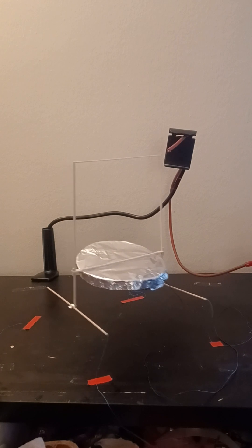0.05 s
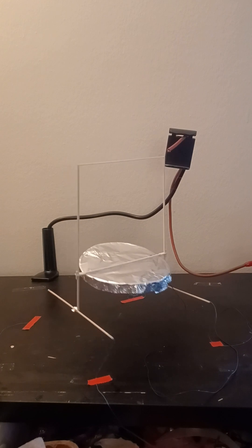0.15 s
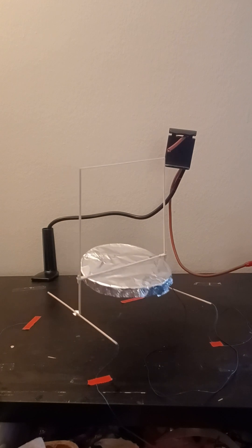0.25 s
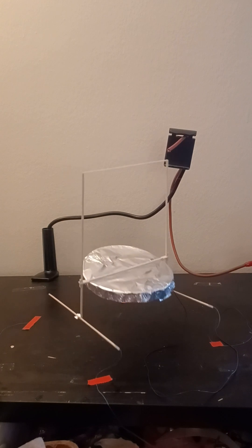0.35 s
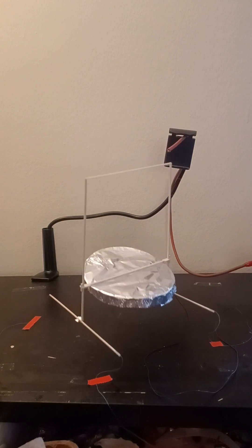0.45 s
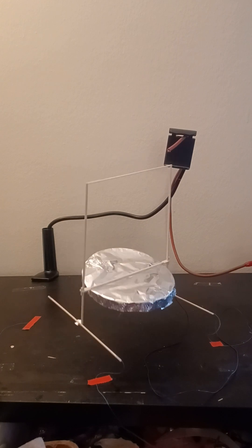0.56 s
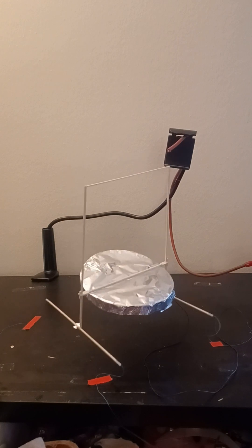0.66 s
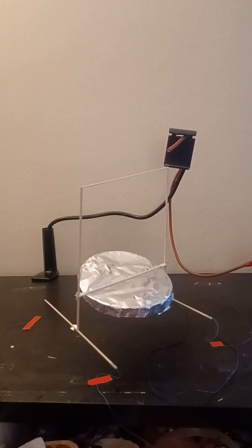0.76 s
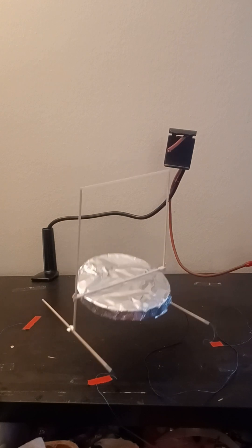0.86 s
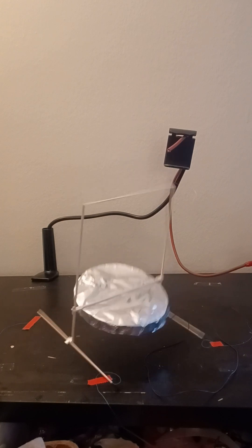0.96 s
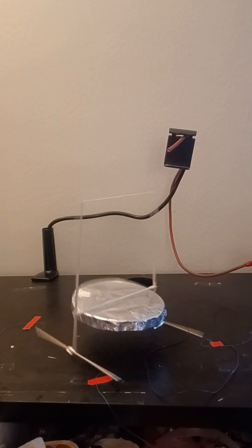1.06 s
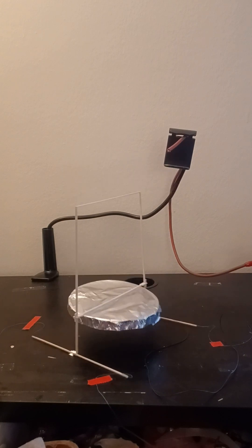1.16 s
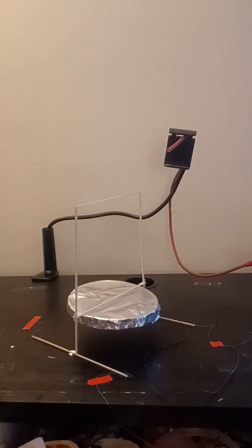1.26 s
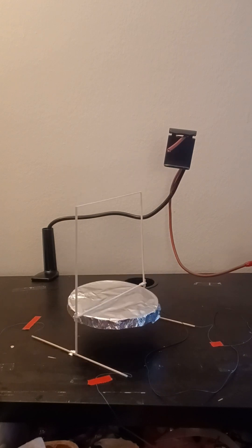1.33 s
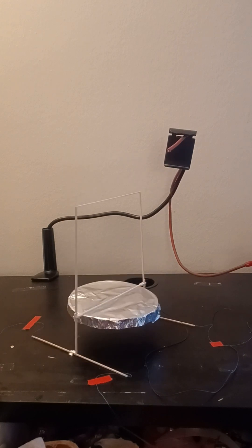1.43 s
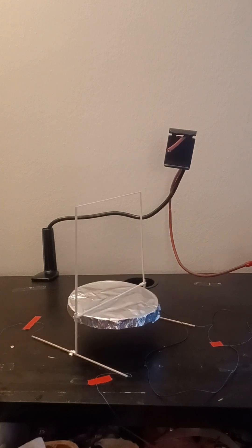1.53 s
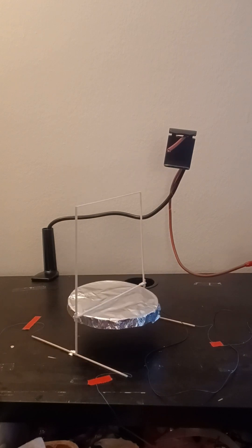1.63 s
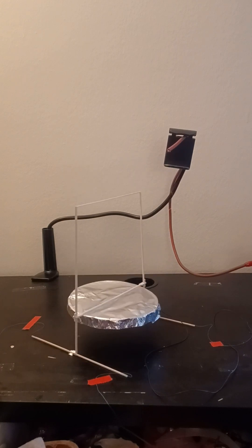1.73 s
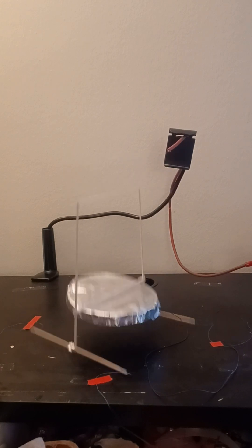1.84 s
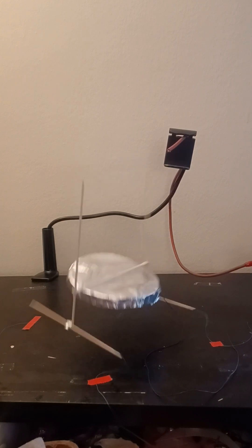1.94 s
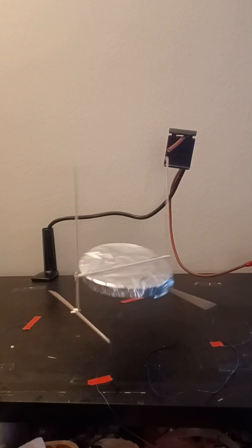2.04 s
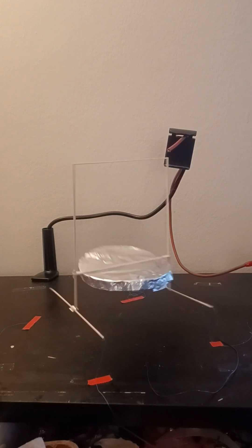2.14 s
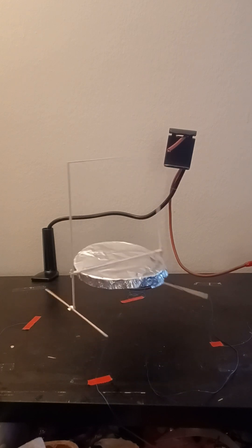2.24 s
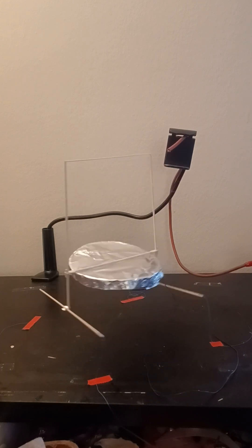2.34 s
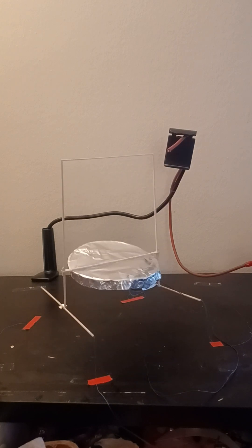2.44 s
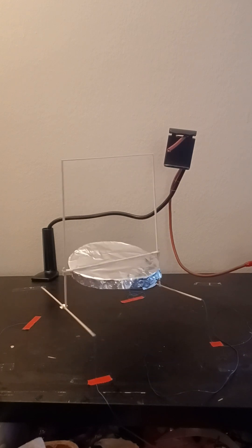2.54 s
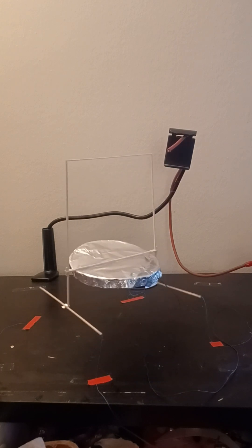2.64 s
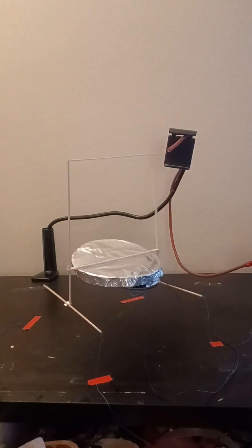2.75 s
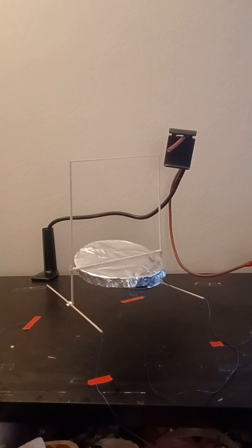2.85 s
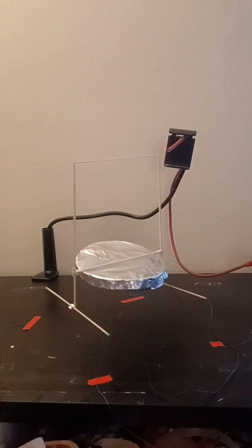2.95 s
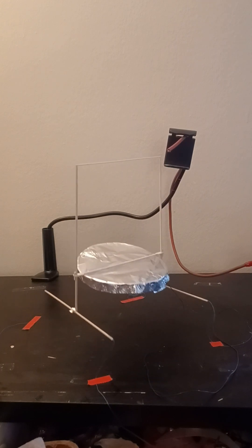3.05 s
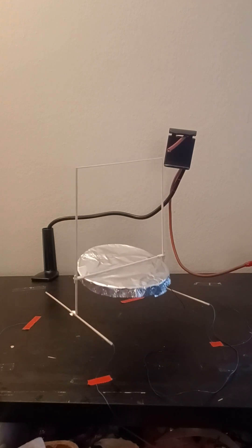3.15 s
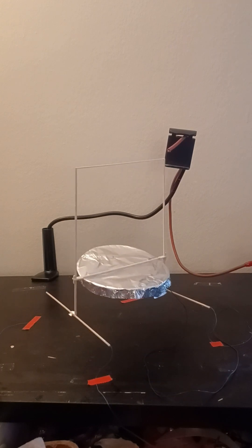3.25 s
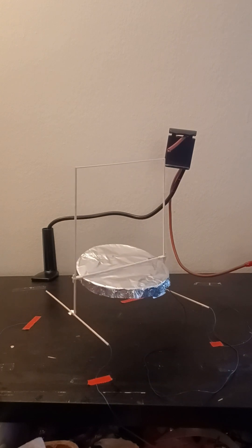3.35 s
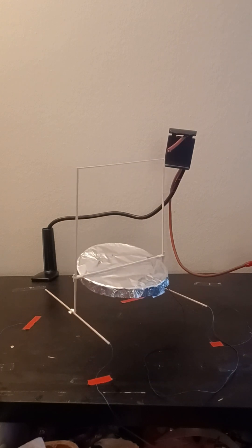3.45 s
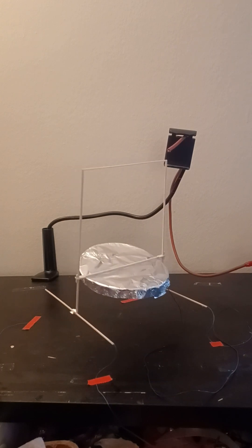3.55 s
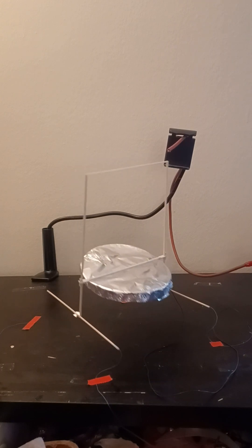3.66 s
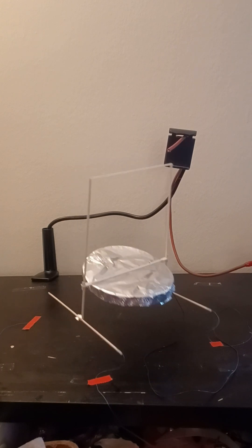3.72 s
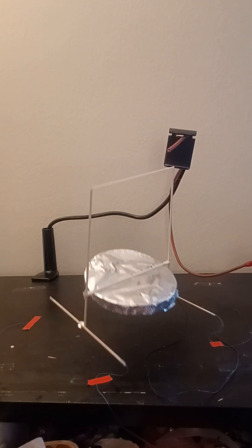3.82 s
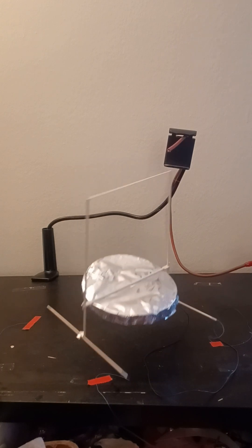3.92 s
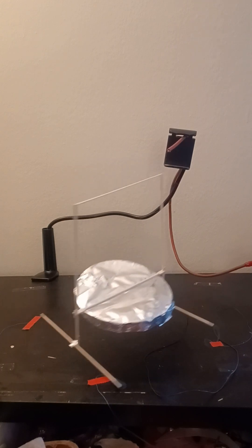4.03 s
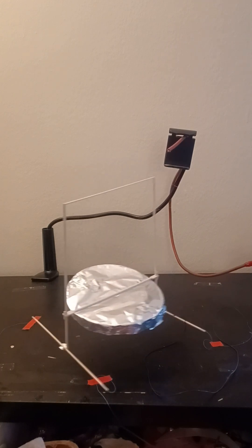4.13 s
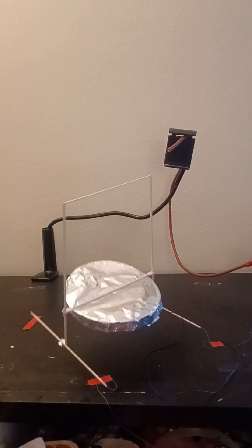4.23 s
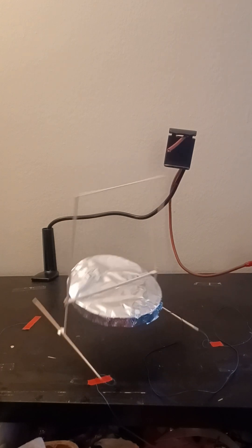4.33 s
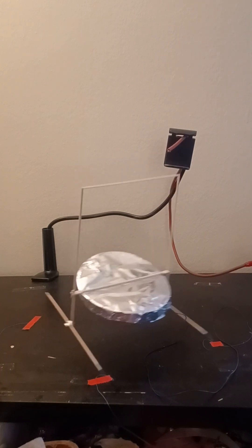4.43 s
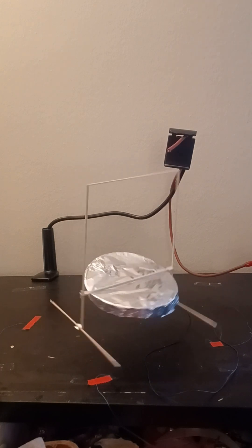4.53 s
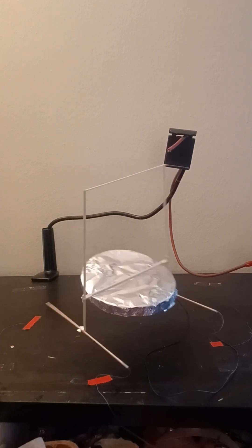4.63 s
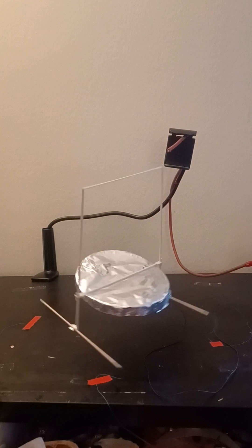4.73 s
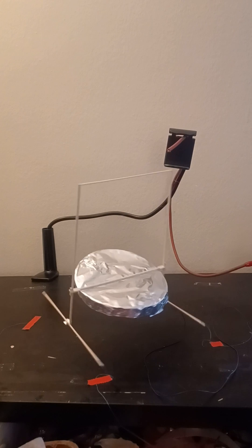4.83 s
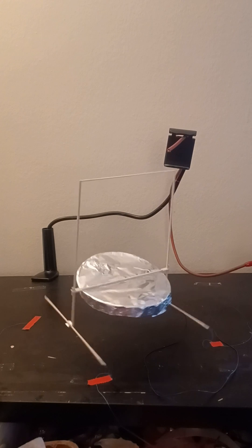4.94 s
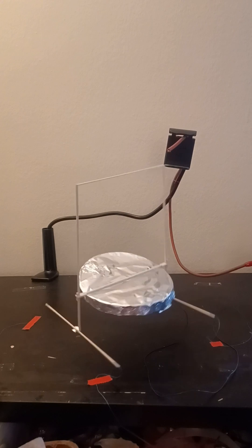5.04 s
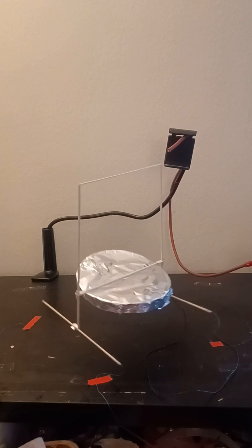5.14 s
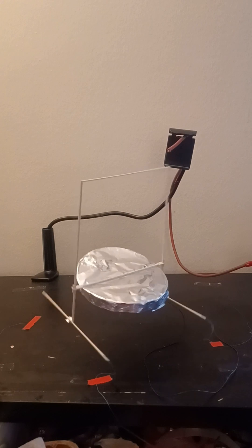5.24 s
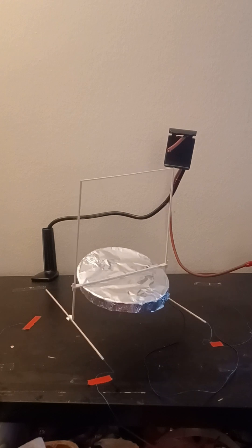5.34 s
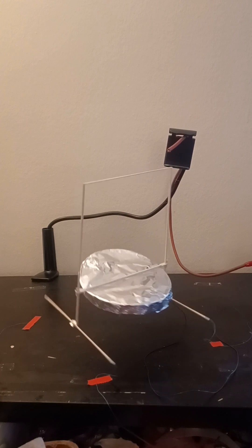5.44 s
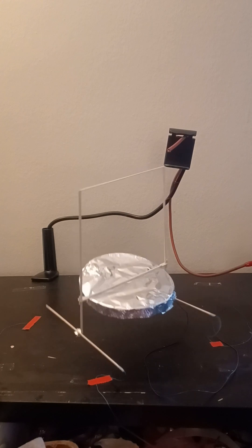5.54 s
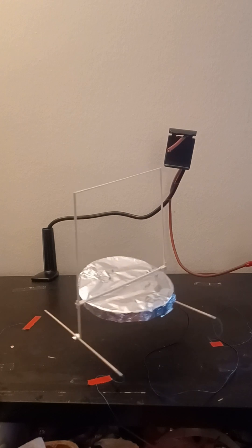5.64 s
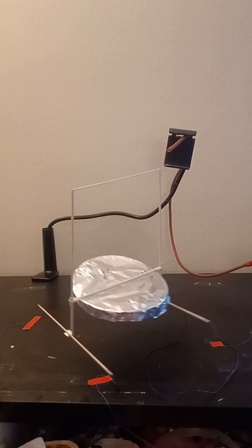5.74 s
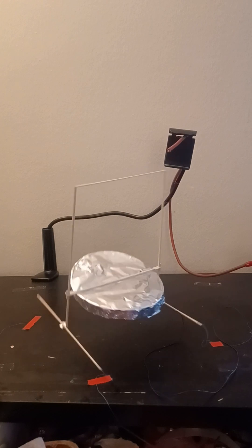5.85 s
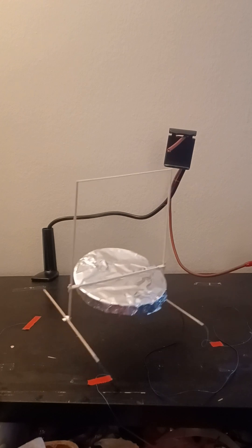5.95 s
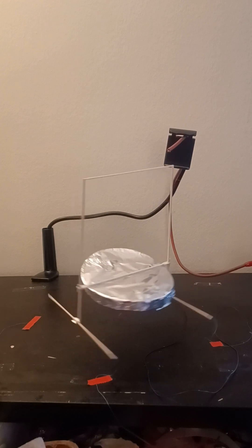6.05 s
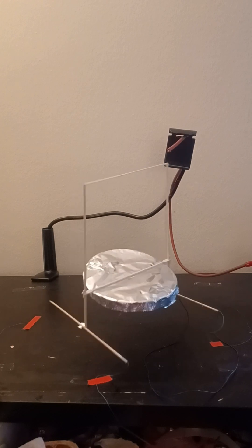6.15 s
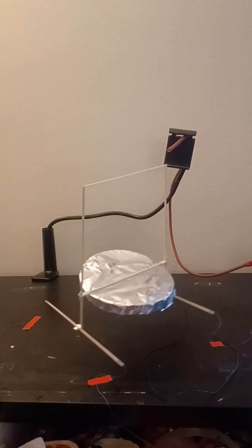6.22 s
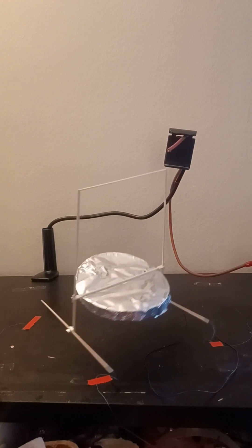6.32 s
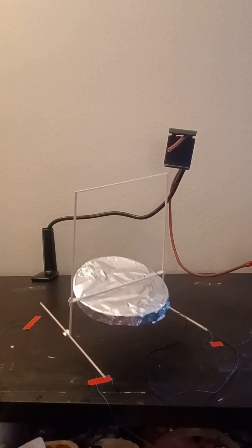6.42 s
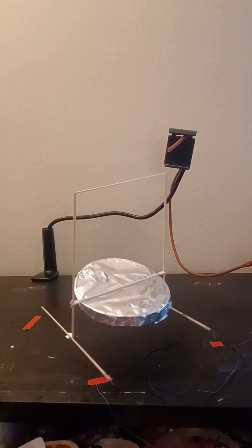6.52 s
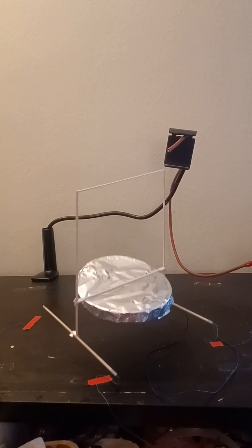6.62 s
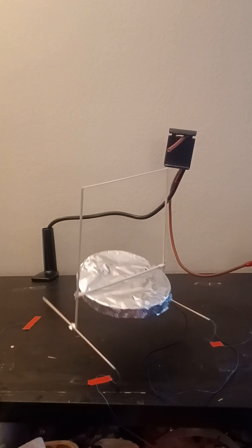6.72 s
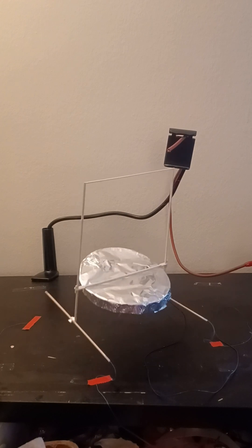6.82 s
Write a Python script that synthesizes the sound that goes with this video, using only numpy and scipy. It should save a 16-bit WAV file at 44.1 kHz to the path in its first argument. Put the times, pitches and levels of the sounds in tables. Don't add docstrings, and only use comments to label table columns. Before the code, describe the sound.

A light foil-covered frame hovers above a bench in a small hard room, a thin wire hissing brightly and steadily. The hiss weakens, the frame taps down, and a loud dry spark snaps, its crack filling the room. The hiss drops almost away; then a faint switch click and it strikes back abruptly, holding to the end over very quiet rumble and hum. Close stereo microphones, noisier and brighter on the left.

```python
import sys
import numpy as np
from scipy import signal
from scipy.io import wavfile
from scipy.ndimage import uniform_filter1d

SR = 44100
rng = np.random.default_rng(int(sys.argv[2]) if len(sys.argv) > 2 else 0)


def transcribe(signal):
    frames = np.atleast_2d(signal).T
    limited = np.clip(frames, -1, 1)
    pcm = np.round(limited * 32767).astype(np.int16)
    wavfile.write(sys.argv[1], SR, pcm)


def volts_from_db(level):
    exponent = np.asarray(level, float) / 20
    return 10 ** exponent


N = 303408

# (frequency [Hz], level [dB per Hz])
HISS_LEFT = [(300, -103), (800, -97), (1250, -91.5), (1500, -88.5), (2650, -83), (3100, -82.5), (5000, -78),
             (6400, -74.5), (7000, -77.5), (7600, -85), (8500, -84), (11000, -76), (13300, -68.5),
             (15500, -68)]
HISS_RIGHT = [(300, -102.5), (800, -100.1), (1250, -100.4), (1500, -92.5), (2650, -85), (3100, -83),
              (5000, -77.5), (6400, -84), (7000, -81.5), (7600, -88.5), (8500, -88), (11000, -84),
              (13300, -81), (15500, -86)]
# (frequency [Hz], width [Hz], level [dB])
REFLECTIONS = [(1180, 80, 2), (1500, 40, 4), (1680, 50, 3), (1940, 50, 4), (2430, 90, -2), (2000, 220, 1.5),
               (2650, 250, -1.5), (2850, 80, -2), (3300, 200, 2), (3445, 30, 2), (3550, 60, -4),
               (3770, 60, 4), (4900, 50, 2), (5050, 80, -2)]
# (frequency [Hz], level [dB per Hz])
SNAP_LEFT = [(150, -82), (400, -80), (1400, -71.5), (2500, -75), (4000, -71), (6800, -68), (7500, -84),
             (9000, -74.5), (12000, -78), (13000, -72), (15500, -90)]
SNAP_RIGHT = [(150, -83), (400, -83), (1400, -74), (2500, -76.5), (4000, -71.5), (6800, -75.5), (7500, -78),
              (9000, -82), (12000, -80), (13000, -81), (15500, -82)]
# (time [s], level [dB], burst length [s], direct sound [dB])
SPARKS = [
    (1.0665, -14.5, 0.01, -10),
    (1.099, -11.5, 0.0081, -8),
    (1.11, -5, 0.025, -7.5),
]
# (time [s], level [dB], burst length [s], direct sound [dB])
SWITCH = (1.7973, -35, .002, -5)
PARTS = {"thread": (2010, 140, 1), "strut": (2120, 760, 3), "foil": (4900, 4800, 1.5),
         "rim": (14400, 4000, 13), "foot": (1500, 460, 5.5), "joint": (2380, 600, -2),
         "board": (910, 300, 4), "bench": (600, 540, -1.9), "lead": (980, 160, -1), "clamp": (810, 180, -3),
         "floor": (229, 20, 3)}
# (time [s], part, level [dB], scrape length [s])
TOUCHES = [(0.927, "thread", -61.5, .03), (0.944, "foil", -53, 0.015), (0.946, "strut", -60, .049),
           (1.0665, "board", -61, .0057), (1.066, "joint", -47.5, .003), (1.0668, "foot", -47, .0053),
           (1.097, "rim", -33.5, 0.017), (1.102, "bench", -59, .031), (2.1, "lead", -58.5, 0.062),
           (2.131, "clamp", -63.5, 0.11), (2.506, "floor", -63.5, 0.022), (2.718, "floor", -59.5, 0.12),
           (3.022, "lead", -62, 0.047), (0.946, "clamp", -69, .05)]
# (frequency [Hz], t60 [s])
ROOM_T60 = [(200, 0.43), (1500, 0.38), (5000, 0.34), (9000, 0.27), (15000, 0.29)]
# (frequency [Hz], likeness [-1 to 1])
ALIKE = [(60, 0.63), (180, 0.91), (550, 0.048), (1650, 0.32), (4970, 0.049), (15000, -0.05)]
# (frequency [Hz], width [Hz], level [dB])
HUM = [(59.6, 5, -84.5), (120.6, 6.8, -79), (164.7, 4.4, -88), (224.8, 13.6, -81)]
# (time [s], level [dB], half length [s])
SURGES = [(.45, 1.5, .2), (2.4, 5.5, .4), (3.6, 4.5, 0.41), (4.2, 2.5, 0.083), (4.95, 2.5, 0.091),
          (6.05, 5, 0.086), (6.85, 4, 0.091)]
# (frequency [Hz], level [dB per Hz])
FLOOR_LEFT = [(30, -110), (70, -89), (120, -89), (230, -91.5), (400, -101), (1000, -115), (2500, -125.5),
              (5250, -126), (5500, -110.5), (6900, -112.5), (7300, -124), (12900, -117), (13200, -106),
              (15500, -103.5)]
FLOOR_RIGHT = [(30, -114.8), (70, -102.1), (120, -88.5), (230, -94), (400, -109.5), (1000, -114.0),
               (2500, -122.5), (5100, -123.1), (5700, -119.1), (6900, -120.2), (7500, -123.4),
               (12500, -124.6), (13500, -124.0), (15500, -124.1)]

HISS_DB, TREBLE_HZ, DIRECT_DB = 1, 9000, -11.5
STRETCHES = 3
BIGGEST = 4.0
ONE_VOICE_HZ, ONE_VOICE = 3420, 0.49
FLUTTER_DB, FLUTTER_SIZE = 0.5, 1200
SAG_AT_S, SAG_S, SAG_DB = 0.82, 0.047, -12
SHORT_AT_S, SHORT_S, OFF_DB = 1.095, 0.02, -12
LEAK_DB_PER_S = -37
RESTART_AT_S, STRIKE_DB, RESTART_S = 1.815, -24, 0.009
SURGE_DB, SETTLE_S, THIN_STRIKE = 6, 0.016, 0.35
CREEP_DB_PER_S, AFTER_DB = 0.27, -0.9
THIN_FULL, THIN_WEAK = 0.081, 0.36
SNAP_DB = 38.5
ONSET_SHARE = 0.1
BASS_ALIKE, BASS_HZ = 0.74, 500
RUMBLE_DB, WAVER_DB = -3, 1.5
PORT_LAG = 4
EDGE_HZ, LOW_CUT_HZ = 15790, 48


def corona(per_s=9000, spread_db=3.0):
    level_db, treble = field()
    lead = SR // 2
    level_db = np.pad(level_db, (lead, 0), "edge")
    share = np.pad(treble, (lead, 0), "edge")
    common = rng.standard_normal(N + lead)
    long_waves = signal.butter(2, ONE_VOICE_HZ, fs=SR, output="sos")
    high = signal.butter(2, TREBLE_HZ, "high", fs=SR, output="sos")
    out = np.zeros((2, N))
    for _ in range(STRETCHES):
        chance, size, sign = rng.random((3, N + lead))
        strength = volts_from_db(spread_db * np.minimum(-np.log(size + 1e-9), BIGGEST))
        clicks = evened((chance < per_s / SR) * strength * np.sign(sign - 0.5))
        in_step = np.sqrt(ONE_VOICE) * common + (np.sqrt(1 - ONE_VOICE) - 1) * clicks
        clicks += signal.sosfiltfilt(long_waves, in_step)
        current = uniform_filter1d(rng.standard_normal(N + lead), FLUTTER_SIZE)
        flutter = evened(uniform_filter1d(current, FLUTTER_SIZE))
        bright = signal.sosfilt(high, clicks)
        gain = volts_from_db(level_db + FLUTTER_DB * np.tanh(flutter))
        hiss = gain * ((1 - share) * clicks + share * bright)
        out += room(hiss, DIRECT_DB)[:, lead:lead + N]
    return volts_from_db(HISS_DB) * colour(out / np.sqrt(STRETCHES), HISS_LEFT, HISS_RIGHT, REFLECTIONS)


def field():
    t = np.arange(N) / SR
    before = SAG_DB * ramp(SAG_AT_S, SAG_S) + OFF_DB * ramp(SHORT_AT_S, SHORT_S)
    before += LEAK_DB_PER_S * np.maximum(t - SHORT_AT_S, 0)
    fresh = np.exp(-np.maximum(t - RESTART_AT_S, 0) / SETTLE_S) * (t >= RESTART_AT_S)
    after = STRIKE_DB * (1 - ramp(RESTART_AT_S, RESTART_S)) + AFTER_DB + SURGE_DB * fresh
    drop_db = np.where(t < RESTART_AT_S, before, after)
    weakness = np.clip(drop_db / SAG_DB, 0, 1)
    thin = THIN_FULL + (THIN_WEAK - THIN_FULL) * weakness + THIN_STRIKE * fresh
    return drop_db + CREEP_DB_PER_S * (t - N / SR / 2), thin


def sparks():
    out = np.zeros((2, N))
    for s, db, seconds, direct_db in SPARKS + [SWITCH]:
        add(out, s, volts_from_db(db) * room(burst(seconds), direct_db))
    return volts_from_db(SNAP_DB) * colour(out, SNAP_LEFT, SNAP_RIGHT)


def knocks(direct_db=-4):
    out = np.zeros((2, N))
    for s, part, db, seconds in TOUCHES:
        hz, width, pan_db = PARTS[part]
        scrape = np.pad(burst(seconds), (0, 3000))
        ring = resonate(resonate(scrape, hz, width), hz, width)
        gain = volts_from_db([[db + 35 + pan_db / 2], [db + 33.5 - pan_db / 2]])
        add(out, s, gain * room(ring / np.linalg.norm(ring), direct_db))
    return out


def floor():
    own, shared = rng.standard_normal((2, N)), rng.standard_normal(N)
    low = signal.butter(2, BASS_HZ, fs=SR, output="sos")
    swell = rumble_swell()
    rumble = swell * (np.sqrt(BASS_ALIKE) * shared + np.sqrt(1 - BASS_ALIKE) * own)
    bass = signal.sosfilt(low, rumble - own)
    hum = np.zeros((2, N))
    for hz, width, db in HUM:
        band = resonate(resonate(shared + 0.13 * own, hz, width), hz, width)
        hum += volts_from_db(db) * evened(band)
    mains = volts_from_db(-74) * np.sin(2 * np.pi * 120 * np.arange(N) / SR)
    return colour(own + bass, FLOOR_LEFT, FLOOR_RIGHT) + (swell * hum + mains) * volts_from_db([[2.5], [-2.5]])


def rumble_swell():
    t = np.arange(N) / SR
    waver = sum(np.sin(2 * np.pi * (f * t + rng.random())) / np.sqrt(f) for f in np.geomspace(0.5, 5, 12))
    swells = sum(db * np.exp(-((t - s) / half) ** 2) for s, db, half in SURGES)
    return volts_from_db(RUMBLE_DB + WAVER_DB * evened(waver) + swells)


def room(x, direct_db, rise=0.0022):
    hz, t, z = signal.stft(rng.standard_normal((2, SR // 2)), SR, nperseg=128)
    alike = np.clip(read(ALIKE, hz), 0, 0.95)[:, None]
    z = np.array([z[0], alike * z[0] + np.sqrt(1 - alike ** 2) * z[1]])
    t60 = read(ROOM_T60, hz)[:, None]
    decay = volts_from_db(-60 * t / t60) / np.sqrt(t60)
    tail = signal.istft(z * decay, SR, nperseg=128)[1]
    tail *= 1 - np.exp(-np.arange(tail.shape[1]) / SR / rise)
    tail /= np.linalg.norm(tail, axis=1, keepdims=True)
    tail[[0, 1], [PORT_LAG, 0]] += volts_from_db(direct_db)
    return signal.fftconvolve(x[None], tail / np.sqrt(1 + volts_from_db(2 * direct_db)), axes=1)


def colour(x, left, right, ridges=()):
    hz = abs(np.fft.fftfreq(4096, 1 / SR))
    ripple_db = sum(db * np.exp(-((hz - f) / width) ** 2) for f, width, db in ridges)
    level_db = [read(left, hz) + ripple_db, read(right, hz) + ripple_db]
    log_gain = np.log(volts_from_db(level_db) * np.sqrt(SR / 2))
    taps = np.fft.ifft(np.exp(np.conj(signal.hilbert(log_gain)))).real[:, :2048]
    return signal.oaconvolve(x, taps, axes=1)[:, :N]


def resonate(x, hz, width):
    turn = np.exp(2j * np.pi * hz * np.arange(x.shape[-1]) / SR)
    r = np.exp(-np.pi * width / SR)
    return 2 * (turn * signal.lfilter([1 - r], [1, -r], x / turn)).real


def burst(seconds):
    t = np.arange(round(5 * seconds * SR) + 4) / SR
    envelope = np.exp(-t / seconds) * (1 - np.exp(-t / (ONSET_SHARE * seconds)))
    x = rng.standard_normal(len(t)) * envelope
    return x / np.linalg.norm(x)


def ramp(start, seconds):
    return np.clip((np.arange(N) / SR - start) / seconds, 0, 1)


def evened(x):
    return x / np.sqrt(np.mean(x ** 2) + 1e-20)


def read(points, hz):
    f, value = np.transpose(points)
    return np.interp(np.log(hz + 1), np.log(f + 1), value)


def add(mix, s, sound):
    part = mix[:, round(s * SR):][:, :sound.shape[1]]
    part += sound[:, :part.shape[1]]


def scene():
    return corona() + sparks() + knocks() + floor()


def low_pass(x):
    return signal.sosfilt(signal.butter(12, 16830, fs=SR, output="sos"), x)


def record(dry):
    low_cut = signal.butter(2, LOW_CUT_HZ, "high", fs=SR, output="sos")
    cut = signal.sosfilt(low_cut, dry)
    edge = signal.firwin(2047, EDGE_HZ, window=("kaiser", 8), fs=SR)
    mix = signal.oaconvolve(cut, edge[None], "same", axes=1)
    return low_pass(mix)


dry = scene()
out = record(dry)
transcribe(out)
```